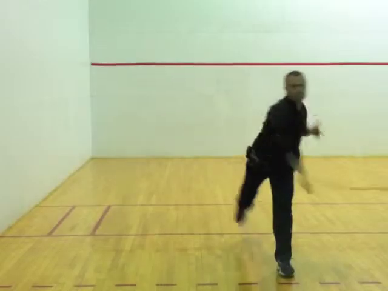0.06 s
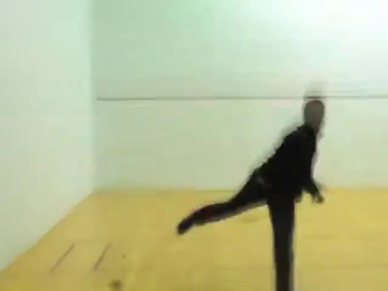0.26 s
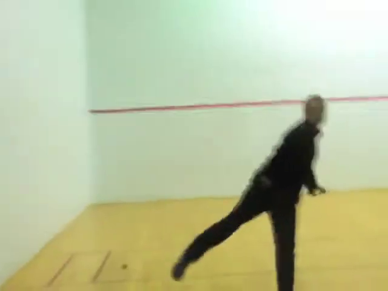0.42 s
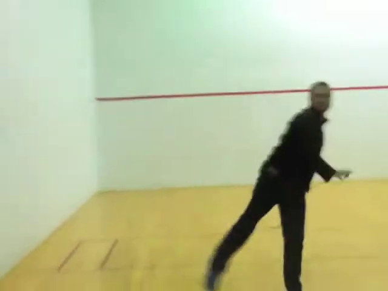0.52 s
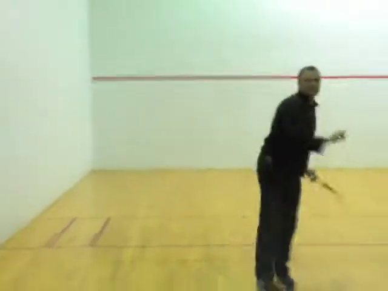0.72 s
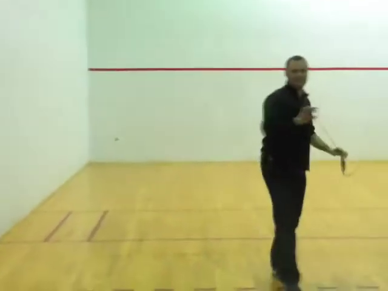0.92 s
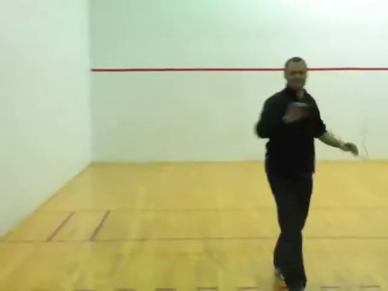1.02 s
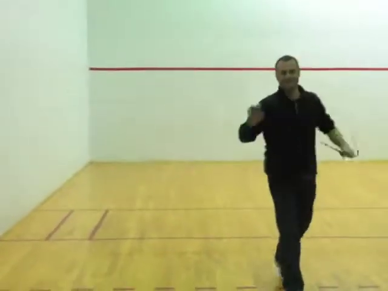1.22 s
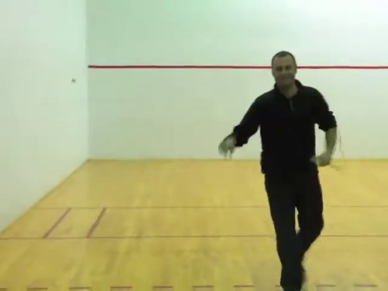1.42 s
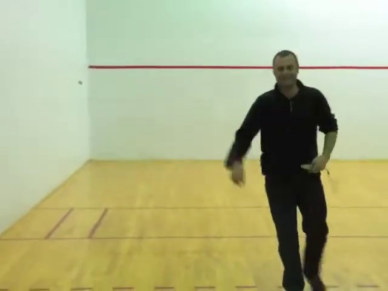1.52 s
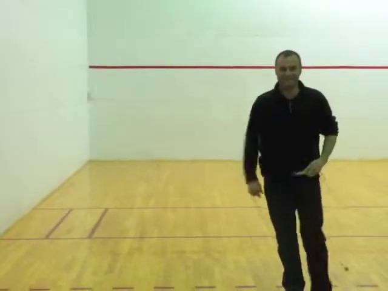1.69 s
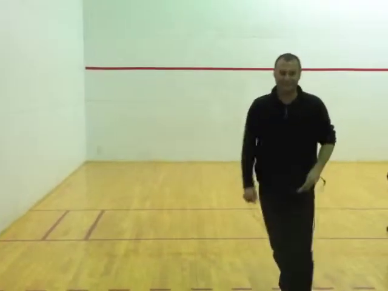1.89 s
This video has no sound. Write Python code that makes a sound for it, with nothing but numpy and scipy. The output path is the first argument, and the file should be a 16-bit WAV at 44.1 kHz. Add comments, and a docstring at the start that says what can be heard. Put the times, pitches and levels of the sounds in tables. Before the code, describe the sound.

A racquet smacks a rubber ball with a loud crack that echoes around an indoor court.

```python
"""Racquet stroke in a hard-walled court

A racquet swishes and smacks a hollow rubber ball, and the crack overloads the microphone.
The bare walls absorb little, so the ball's ping and the room's boom hang in a long echo.
The ball knocks far away as it rebounds. Over a steady hum the player steps forward,
with soft thuds, a faint shoe squeak and a rustle of clothes."""
import sys
import numpy as np
from scipy import signal
from scipy.fft import rfft, irfft
from scipy.io import wavfile

SR = 44100
rng = np.random.default_rng(int(sys.argv[2]) if len(sys.argv) > 2 else 0)


def wav_out(sig):
    """Save sig, one row per channel (or a flat mono array), as 16-bit PCM at SR to the path in sys.argv[1]."""
    wavfile.write(sys.argv[1], SR, np.round(np.clip(np.atleast_2d(sig).T, -1, 1) * 32767).astype(np.int16))


N = 85995
T = np.arange(N) / SR
HZ = np.maximum(np.arange(N // 2 + 1) * SR / N, 1)
HIT_S = 0.2217

# Noise spectra of the sources. Each row: frequency in Hz, relative spectral density in dB.
HUM_SPECTRUM = [(30, -46), (100, -8.5), (220, 2), (420, -5.5), (750, -8), (1300, 0), (1750, -16),
                (2900, -18), (4200, -29.5), (7000, -40), (10000, -46.5), (15000, -67)]
STEP_SPECTRUM = [(40, -49), (110, -8), (230, 8), (450, -8.5), (1100, -2.5), (1800, -35), (5000, -47),
                 (12000, -63)]
RUSTLE_SPECTRUM = [(2000, 2), (5000, -6), (8000, 0.5), (8800, -3), (9800, 3.5), (11500, -4.5),
                   (12500, -17.5)]
KNOCK_SPECTRUM = [(40, -45), (150, -16), (300, 14.5), (600, -5.5), (1150, 8), (1900, -23), (4000, -43),
                  (10000, -55)]
SWISH_SPECTRUM = [(50, -47), (500, -5), (2000, 2.5), (4200, 0.5), (6200, -17), (9000, -17), (12500, -28.5)]
SNAP_SPECTRUM = [(100, -35), (1500, -11), (3500, -3), (6500, 3.5), (8500, -10.5), (15000, -31)]
CRACK_SPECTRUM = [(40, -36), (300, -14), (1200, 18.5), (3000, 6.5), (6500, -0.5), (9000, -16.5),
                  (15000, -25.5)]
# Footfalls. Each row: start in seconds, level in dB, 60 dB decay time in seconds.
FOOTFALLS = [(1.17, -33.5, 1.55), (1.225, -32.5, 1.26), (1.483, -41, 3.7)]
# Distant rebounds of the ball. Each row: start in seconds, level in dB.
REBOUNDS = [(0.2985, -7.5), (1.419, -33), (1.734, -29)]
# The crack and its first reflections. Each row: delay in seconds, relative level in dB.
CRACK_ARRIVALS = [(0, -1.5), (.0022, -3), (.0054, -11.5), (0.014, -0.5), (0.0162, -7.5)]
# Modes of the sprung floor, the room and the struck ball with the racquet.
# Each row: frequency in Hz, relative level in dB, 60 dB decay time in seconds.
FLOOR_MODES = [(155.9, -0.5, 0.65), (232.1, -6, 0.81)]
ROOM_MODES = [(119.8, -28, 1.8), (131.5, -33, 0.6), (164.8, -13.5, 1.51), (181, -40, 1.6),
              (201.7, -18, 0.62), (263.4, -8.5, 0.64), (322.3, -16.5, 0.99), (453.6, -6.5, 0.65),
              (555.5, -17, 0.43), (615.5, -7, 0.53), (691, -24, 0.47), (756, -17, 0.44)]
BALL_MODES = [(951, -16.5, 0.2), (962.6, -8, 0.33), (1035.5, -2, 0.088), (1203, -9, 0.05),
              (1288, -4.5, 0.26), (1427, -10.5, .11), (1539, -14.5, 0.25), (2453, -21.5, .2),
              (2726, -23, 0.45), (3410, -32.5, 0.45), (3480, -23, .12), (4400, -27.5, 0.17),
              (5540, -24, .1), (6540, -29, .09), (7530, -36, .08), (9000, -36, 0.092)]
# Dense early reflections and the long echo.
# Each row: frequency in Hz, spectral density in dB, 60 dB decay time in seconds.
EARLY_BANDS = [(40, -24.5, 0.25), (70, -17.5, .8), (100, -4, 1.5), (170, 10, 1.11), (390, 10.5, 0.69),
               (750, 11, 0.45), (1140, 11, 0.43), (2010, -6, 0.31), (3020, -2, 0.15), (5460, -15.5, 0.17),
               (8500, -21, 0.11), (15000, -47.5, 0.071)]
ECHO_BANDS = [(40, -47.5, 2), (91, -18.5, 3), (173, -7.5, 2.1), (324, -10, 6.2), (734, -11.5, 5.3),
              (1070, -5.5, 5.5), (1283, -3.5, 3.97), (1677, -15.5, 2.8), (2090, -24.5, 2.55),
              (3020, -21.5, 2.59), (4300, -31, 1.25), (6640, -36.5, 0.96), (10000, -42, 0.56),
              (15000, -63.5, .5)]
# Resonant peaks and dips in the echo. Each row: centre in Hz, width in Hz, gain in dB.
ECHO_RESONANCES = [(439.6, 15, 6), (659, 34, -9), (764, 13, 11.5), (977, 17, 6.5), (1055.7, 24, 12),
                   (1259.3, 14, 9), (1427, 8.3, 2.5), (1860, 17, 9.5), (2015, 21, 1.5), (2325, 58, 9.5),
                   (2600, 120, -3.5), (2730, 70, 2.5), (2950, 50, 0), (3060, 72, 6), (3390, 140, -6),
                   (3620, 40, 2.5)]


def from_db(db):
    """Amplitude grows tenfold for every 20 dB."""
    return 10 ** (np.asarray(db) / 20)


def at_hz(table, hz, column=1):
    """Interpolation of a table column along a logarithmic frequency axis."""
    columns = np.transpose(table)
    return np.interp(np.log(hz), np.log(columns[0]), columns[column])


def lowpass(x, cutoff_hz, order):
    """A Butterworth filter passes the lows and rolls off above its cutoff."""
    return signal.sosfilt(signal.butter(order, cutoff_hz, fs=SR, output="sos"), x)


def rippled(spectrum):
    """Interference between hard walls puts narrow, random peaks and dips into the treble."""
    grid_hz = np.arange(2000) * 50
    depth_db = 3.5 * np.minimum(HZ / 2500, 1) ** 2
    return spectrum * from_db(depth_db * np.interp(HZ, grid_hz, rng.standard_normal(len(grid_hz))))


def noise(spectrum, hard_walls=False):
    """Spectral weighting turns white noise into coloured noise of rms 1."""
    bins = rfft(rng.standard_normal(N)) * from_db(at_hz(spectrum, HZ))
    x = irfft(rippled(bins) if hard_walls else bins, N)
    return x / x.std()


def flutter(width_hz):
    """Slow noise of rms 1: as a modulator it spreads a tone into a narrow band."""
    x = lowpass(rng.standard_normal(N), width_hz, order=2)
    return x / x.std()


def swell(start, rise, t60):
    """Exponential build-up and decay of an amplitude, with all times in seconds."""
    age = np.maximum(T - start, 0)
    return (1 - np.exp(-age / max(rise, 1e-5))) * from_db(-60 * np.minimum(age / t60, 10))


def ring(hz, db, t60, start, rise):
    """A struck mode vibrates as a damped sinusoid."""
    return from_db(db) * swell(start, rise, t60) * np.sin(2 * np.pi * hz * (T - start))


def reflections(bands, delay_cycles, rise_cycles, colour_db=0):
    """A diffuse field builds up over a set number of periods, so the low bands arrive last."""
    spectrum = rippled(rfft(rng.standard_normal(N))) * from_db(at_hz(bands, HZ) + colour_db)
    centres = np.geomspace(30, 16000, 28)
    band_position = np.interp(np.log(HZ), np.log(centres), np.arange(len(centres)))
    field = np.zeros(N)
    for k, hz in enumerate(centres):
        band = irfft(spectrum * np.maximum(1 - abs(band_position - k), 0), N)
        field += band * swell(HIT_S + delay_cycles / hz, rise_cycles / hz, at_hz(bands, hz, column=2))
    return field


def background():
    """Hum and lingering echoes merge into stationary noise."""
    return from_db(-45.5) * noise(HUM_SPECTRUM)


def player():
    """Footfalls excite the modes of a sprung wooden floor; friction sounds in a shoe and in clothes."""
    rise_s = 0.021
    steps = sum(from_db(db) * swell(start, rise_s, t60) * noise(STEP_SPECTRUM)
                for start, db, t60 in FOOTFALLS)
    thuds = sum(ring(hz, db + mode_db, t60, start, rise_s)
                for start, db, _ in FOOTFALLS for hz, mode_db, t60 in FLOOR_MODES)
    unsteady_tone = flutter(width_hz=40) * np.sin(2 * np.pi * 3510 * T)
    squeak = from_db(-59.5) * swell(start=1.56, rise=0.1, t60=3.5) * unsteady_tone
    rustle = from_db(-70) * swell(start=1.06, rise=0.16, t60=5.7) * noise(RUSTLE_SPECTRUM)
    return lowpass(steps + thuds + squeak + rustle, 11800, order=12)


def rebounds():
    """Distant impacts of the ball on walls and floor give dull, quickly damped knocks."""
    envelope = sum(from_db(db) * swell(start, rise=0.0021, t60=0.04) for start, db in REBOUNDS)
    return envelope * noise(KNOCK_SPECTRUM)


def court():
    """Reverberation of the hit: booming standing waves, early reflections and a long pinging echo."""
    boom = sum(ring(hz, db, t60, HIT_S, rise=0.055 * (157 / hz) ** 3.6)  # low modes build up slowly
               for hz, db, t60 in ROOM_MODES)
    early = reflections(EARLY_BANDS, delay_cycles=1.9, rise_cycles=1.1)
    ping_db = sum(db / (1 + (2 * (HZ - hz) / width) ** 2) for hz, width, db in ECHO_RESONANCES)
    echo = reflections(ECHO_BANDS, delay_cycles=7.2, rise_cycles=45, colour_db=ping_db)
    return boom + early + echo


def swish():
    """Turbulent air hisses through the strings, with a falling whistle, until the ball is met."""
    start_s, rise_s = 0.12, 0.042
    whistle_hz, fall_hz_per_s = 4950, 13000
    age = T - start_s
    envelope = np.clip(age / rise_s, 0, 1) * (T < HIT_S)
    phase = 2 * np.pi * (whistle_hz - fall_hz_per_s * age / 2) * age
    whistle = flutter(width_hz=220) * np.sin(phase)
    return envelope * (from_db(-47.5) * noise(SWISH_SPECTRUM) + from_db(-57) * whistle)


def smack():
    """A brief impact is broadband: the strings snap, crack and excite the hollow ball's modes."""
    snap = from_db(-7.5) * swell(HIT_S, rise=0, t60=0.002) * noise(SNAP_SPECTRUM)
    bursts = sum(from_db(db) * swell(HIT_S + delay, rise=0, t60=0.019) for delay, db in CRACK_ARRIVALS)
    crack = from_db(-7) * bursts * noise(CRACK_SPECTRUM, hard_walls=True)
    ping = sum(ring(hz, db, t60, HIT_S, rise=0.0012) for hz, db, t60 in BALL_MODES)
    return snap + crack + ping


def scene():
    """The sound pressures of all sources add by superposition in one channel."""
    return (swish() + smack() + court() + rebounds() + player() + background())[None]


def record(dry):
    """Gain control ducks after the hit and recovers; overload rounds the peaks; filters cut the top."""
    threshold_db, duck_share, attack_s, release_db_per_s = -19, 0.24, 0.03, 21
    ceiling, hardness = 0.7, 3.14
    excess_db = np.maximum(20 * np.log10(abs(dry[0]) + 1e-9) - threshold_db, 0)
    held_db = np.maximum.accumulate(excess_db + release_db_per_s * T) - release_db_per_s * T
    pole = np.exp(-1 / (attack_s * SR))
    smoothed_db = signal.lfilter([1 - pole], [1, -pole], held_db)
    ducked = dry * from_db(-duck_share * smoothed_db)
    clipped = ducked / (1 + abs(ducked / ceiling) ** hardness) ** (1 / hardness)
    softened = lowpass(clipped, 12000, order=2)
    return signal.sosfilt(signal.cheby2(12, 70, 16300, fs=SR, output="sos"), softened)


dry = scene()
out = record(dry)
wav_out(out)
```